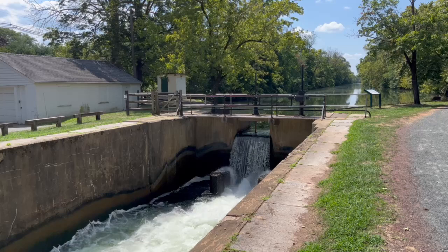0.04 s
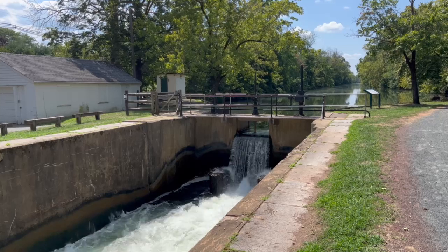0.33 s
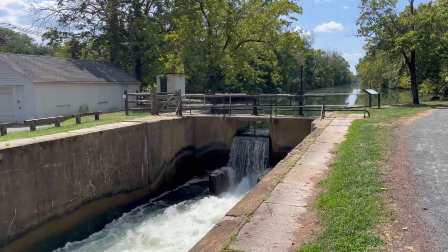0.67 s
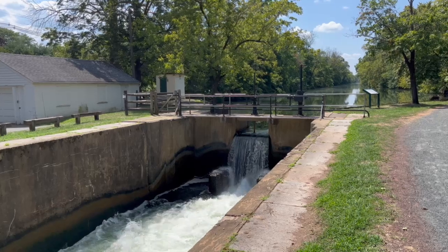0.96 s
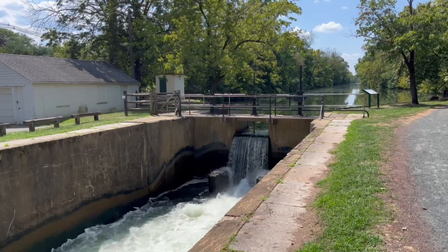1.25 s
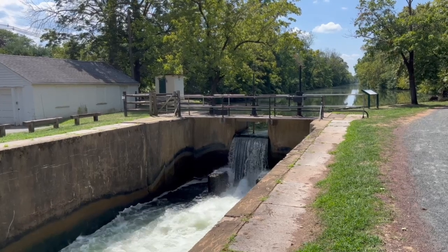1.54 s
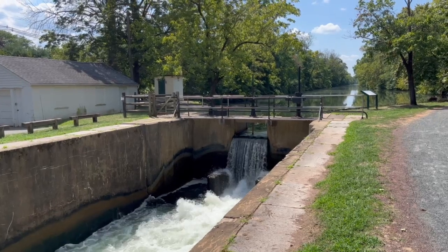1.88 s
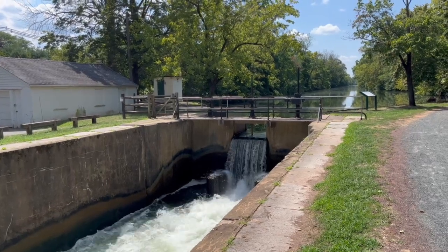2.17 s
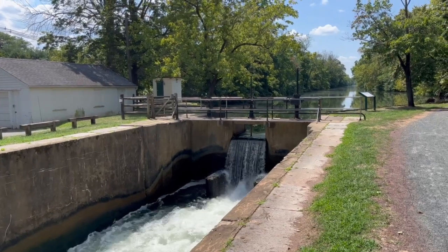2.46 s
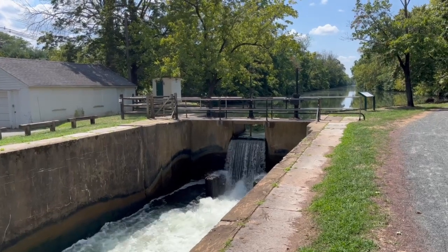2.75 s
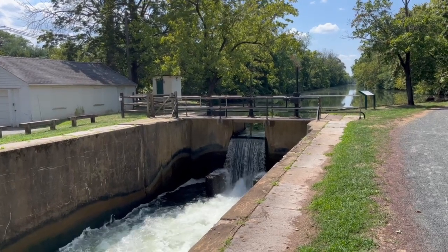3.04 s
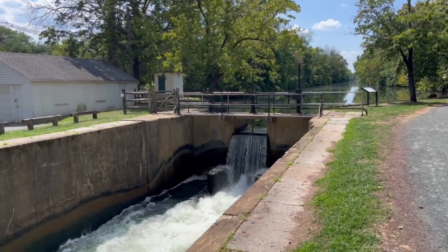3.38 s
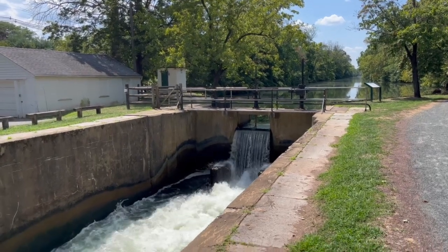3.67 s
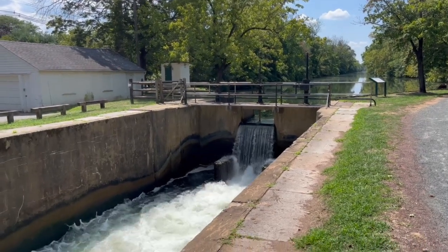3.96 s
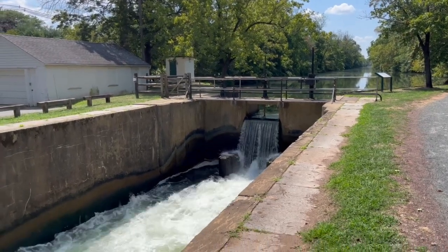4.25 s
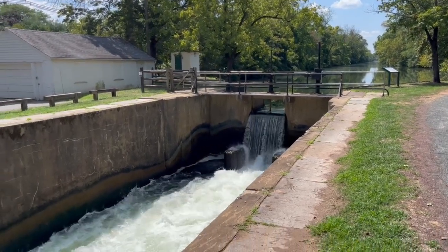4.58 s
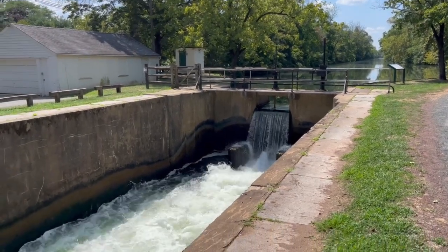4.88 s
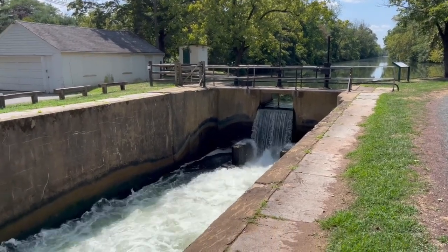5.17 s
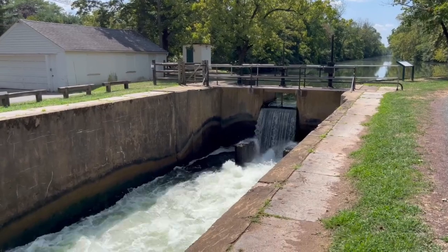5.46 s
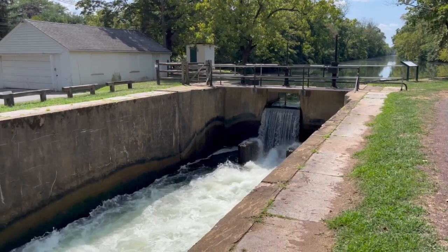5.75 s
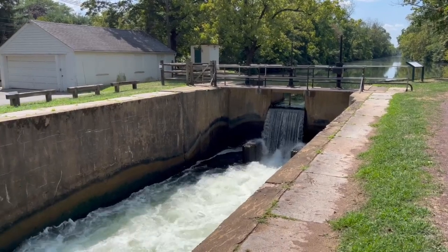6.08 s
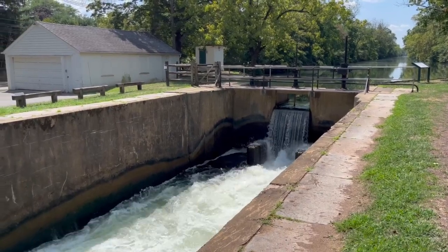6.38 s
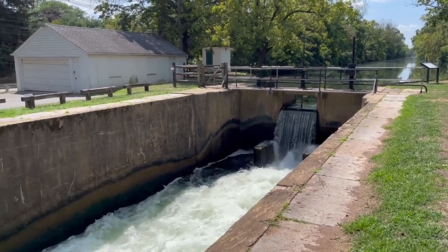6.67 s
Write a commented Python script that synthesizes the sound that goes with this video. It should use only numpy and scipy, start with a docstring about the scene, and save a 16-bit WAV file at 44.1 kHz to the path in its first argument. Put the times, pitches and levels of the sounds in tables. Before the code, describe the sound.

Heard in stereo from the bank of a canal lock, water pours steadily into a pool and roars away as foam. Beneath the rush is a hollow rumble from the walled chamber, dotted with deep gulps, while drops hiss and small bubbles tinkle above it. Around five seconds in, a light fizz swells and recedes. The overall level barely changes.

```python
"""Canal lock, from the bank: water falls over the gate and churns down the concrete chamber.
The plunge drives air resonances between the walls (boom) and drags air pockets under (gulps).
Bubble clouds roar in the race; the falling sheet breaks into hissing drops and small splashes.
Single bubbles ring. Fizzing splash near 2 kHz grows louder for about two seconds, then fades.
A closely spaced microphone pair picks it up."""
import sys
import numpy as np
from scipy import signal
from scipy.fft import rfft, irfft
from scipy.io import wavfile
from scipy.ndimage import uniform_filter1d

SR = 44100
rng = np.random.default_rng(int(sys.argv[2]) if len(sys.argv) > 2 else 0)


def materialize(psi):
    """Save the field psi as 16-bit PCM at rate SR to the path in sys.argv[1].

    A 1-D psi becomes a single channel; in a 2-D psi each row is a channel.
    """
    bounded = np.clip(np.atleast_2d(psi).T, -1, 1)
    quanta = np.round(bounded * 32767).astype(np.int16)
    wavfile.write(sys.argv[1], SR, quanta)


N = 300762
TIME_S, BINS_HZ = np.arange(N) / SR, np.fft.rfftfreq(N, 1 / SR)

# air resonances between the walls (frequency [Hz], half-width [Hz], relative peak density [dB])
CHAMBER_MODES = [(44.3, 6.5, -51.5), (55.5, 7.3, -46.5), (77.7, 13, -49.5), (97.7, 11, -47.5),
                 (131.5, 16.3, -50.5), (179.7, 19.8, -51.5), (216, 9.7, -57)]
# slow surges of the boom (time [s], relative level [dB])
PLUNGE_SURGES = [(0.1, -0.5), (0.5, -1.3), (0.95, 1), (1.35, 1.5), (1.62, -0.5), (2.02, -3.3), (2.3, 0),
                 (3.0, 1), (3.9, 0.2), (4.22, -1.5), (4.45, 1.4), (4.83, -0.3), (5.15, -0.8), (5.6, -2),
                 (6.2, 0.1), (6.8, -0.5)]
# slugs of water hitting the pool (time [s], boom level change [dB])
SLUGS = [(0.652, 6.5), (1.138, 4.5), (1.347, 2), (1.611, 5), (2.827, 6), (3.089, 3.5), (3.22, 2),
         (3.491, 4), (3.823, 3), (4.137, 8), (4.415, -1), (4.575, 1), (4.966, 5), (5.161, 1.5), (6.436, 2)]
# air pockets dragged under (peak time [s], pitch [Hz], peak level [dB])
AIR_POCKETS = [(0.06, 109.6, -26), (0.19, 101.8, -24), (0.439, 192.5, -28.5), (0.94, 178.8, -24.5),
               (1.03, 96.3, -28), (1.15, 91.8, -29), (1.21, 52.6, -22), (1.26, 104, -27), (1.32, 191, -25),
               (1.331, 102.1, -21), (1.6, 59, -27), (2.27, 95.9, -25), (2.43, 82.6, -23.5),
               (2.99, 122.6, -27), (3.1, 110.3, -26), (3.5, 86, -25), (3.82, 90.2, -25), (4.13, 78.3, -30),
               (4.43, 53, -23.5), (4.6, 298, -29), (5.16, 87.5, -27), (5.19, 53.3, -26),
               (5.48, 118.2, -26.5), (6.079, 85.7, -21.5), (6.59, 94.9, -23)]
# bubble clouds in the race (frequency [Hz], relative density [dB])
CHURN_SPECTRUM = [(30, -83), (70, -58), (140, -58), (230, -55), (350, -56), (470, -55.5), (620, -56.3),
                  (800, -58.5), (1190, -62.5), (1420, -62.5), (1820, -66.5), (1910, -70), (3000, -74),
                  (7000, -100)]
# slow surges of the roar (time [s], relative level [dB])
CHURN_SURGES = [(0.1, -0.26), (1.4, -0.45), (2.35, 0.6), (3.3, -0.35), (4.45, -0.14), (4.6, 0.7),
                (4.8, 0.22), (5.33, 0.7), (5.6, -0.5), (5.85, 0.6), (6.4, -0.8), (6.8, -0.11)]
# falling sheet breaking into drops (frequency [Hz], relative density [dB])
SPRAY_SPECTRUM = [(500, -90), (1300, -73), (1950, -70.8), (2300, -69.8), (2950, -69.2), (3130, -69.7),
                  (3420, -67.6), (3660, -69.5), (4000, -70.8), (4180, -70), (4350, -70.8), (4600, -68.9),
                  (5030, -70.9), (5250, -73), (5500, -74.4), (6250, -75.2), (7500, -74.8), (9200, -75.7),
                  (12000, -79.6), (14400, -83.2), (15700, -85.5)]
# slow surges of spray and single bubbles (time [s], relative level [dB])
SPRAY_SURGES = [(0.1, -0.58), (0.45, 0.45), (1.0, -0.7), (1.7, 0.23), (2.1, 0.0), (2.42, 0.8), (2.7, 0.021),
                (3.4, 0.13), (3.73, -0.63), (4.45, -0.13), (5.03, 0.8), (5.3, -0.27), (6.05, 0.65),
                (6.4, -0.45), (6.8, -0.67)]
# microphone pair (frequency [Hz], coherence [0-1], left phase lead [rad], left minus right [dB])
MIC_PAIR = [(60, .999, .05, .2), (250, .98, .19, .8), (600, .91, .32, 2.7), (1100, .79, .58, 1.5),
            (1400, .68, 1, -1.2), (1610, .6, 2.1, -1.9), (1690, .9, .22, .6), (2200, .68, .72, 1.2),
            (2900, .4, 1.7, 1.6), (4000, .4, .41, 2.3), (4900, .4, .89, -.1), (5600, .24, -.62, -2.1),
            (7000, .75, -1.75, .8), (8300, .98, -3.14, 0), (10000, .82, -4.66, 0), (11300, .88, -6.1, 0),
            (12800, .88, -6.5, 0), (15200, .75, -9.4, 0)]


def plunge(level_db=0.5):
    """Falling water pounds the pool and drives the air between the walls."""
    power = sum(gain_of(db) ** 2 / (1 + ((BINS_HZ - hz) / half_width_hz) ** 2) ** 2
                for hz, half_width_hz, db in CHAMBER_MODES)
    boom = coloured(rng.standard_normal((2, N)), np.sqrt(power))
    lumps_db = tumble_db(rms_db=0.75, slow_hz=3.7, fast_hz=19)
    envelope_db = level_db + surge_db(PLUNGE_SURGES) + thumps_db() + lumps_db
    return steadied(boom, window_samples=3000) * gain_of(envelope_db)


def thumps_db(width_s=0.017, lull_delay_s=0.044, lull_share=0.35):
    """A slug of water lifts the boom briefly; a shallow lull follows."""
    level_db = np.zeros(N)
    for at_s, db in SLUGS:
        age_s = TIME_S - at_s
        hit = np.exp(-(age_s / width_s) ** 2)
        lull = np.exp(-((age_s - lull_delay_s) / width_s) ** 2)
        level_db += db * (hit - lull_share * lull)
    return level_db


def gulps(wobble_share=0.0566, rise_per_s=0.406, swell_s=0.046, sink_s=0.043):
    """Big air pockets throb, pitch climbing unsteadily as they rise. Direct row only."""
    wobble = 1 + wobble_share * unit_rms(uniform_filter1d(rng.standard_normal(N), size=800))
    out = np.zeros((2, N))
    for (at_s, hz, db), phase_turns in zip(AIR_POCKETS, rng.random(len(AIR_POCKETS))):
        near = abs(TIME_S - at_s) < 0.25
        age_s = TIME_S[near] - at_s
        pitch_hz = hz * (1 + rise_per_s * age_s) * wobble[near]
        turns = phase_turns + np.cumsum(pitch_hz) / SR
        envelope = np.exp(-(age_s / np.where(age_s < 0, swell_s, sink_s)) ** 2)
        out[0, near] += gain_of(db) * envelope * np.sin(2 * np.pi * turns)
    return out


def churn(level_db=0.21):
    """Bubble clouds tumble down the race and roar."""
    roar = coloured(seething(clump_db=0.7, comb_db=0.44), gain_of(per_bin(CHURN_SPECTRUM)))
    lumps_db = tumble_db(rms_db=0.6, slow_hz=3.4, fast_hz=23)
    return steadied(roar, window_samples=4400) * gain_of(level_db + surge_db(CHURN_SURGES) + lumps_db)


def spray(slaps_per_s=45, decay_s=0.011, splash_rms_db=0.32):
    """Drops hiss; each slap of water lifts the level at once, then decays."""
    hiss = coloured(seething(clump_db=1.0, comb_db=1.85), gain_of(per_bin(SPRAY_SPECTRUM)))
    slaps = rng.exponential(1, N) * (rng.random(N) < slaps_per_s / SR)
    splashes = signal.lfilter([1], [1, -np.exp(-1 / (decay_s * SR))], slaps)
    splashes_db = splash_rms_db * unit_rms(splashes - splashes.mean())
    return steadied(hiss, window_samples=8000) * gain_of(surge_db(SPRAY_SURGES) + splashes_db)


def bubbles(level_db=-43, per_s=600, low_hz=750, high_hz=5200, pitches=48,
            decay_cycles=24, rise=0.008, spread_db=4.1, tilt=0.1):
    """Single bubbles ring briefly, pitch rising as they near the surface."""
    out = np.zeros((2, N))
    age_s = TIME_S[:SR // 10]
    for k, hz in enumerate(np.geomspace(low_hz, high_hz, pitches)):
        decays = age_s * hz / decay_cycles
        envelope = np.exp(-decays) * (1 - np.exp(-10 * decays))
        ring = envelope * np.sin(2 * np.pi * hz * age_s * (1 + rise * decays))
        strengths = gain_of(spread_db * np.minimum(rng.exponential(1, N), 4))
        births = rng.random(N) < per_s / pitches / SR
        out[k % 2] += signal.oaconvolve(strengths * births, ring)[:N] * (low_hz / hz) ** tilt
    return unit_rms(out) * gain_of(level_db + surge_db(SPRAY_SURGES))


def fizz(level_db=-47.8, centre_hz=1950, width_oct=0.71, peak_at_s=5.2, swell_s=0.8):
    """Fizzing splash near 2 kHz grows louder for about two seconds, then fades."""
    band = np.exp(-(np.log2((BINS_HZ + 1) / centre_hz) / width_oct) ** 2)
    splash = unit_rms(coloured(seething(clump_db=-1.0, comb_db=2.5), band))
    envelope = np.exp(-((TIME_S - peak_at_s) / swell_s) ** 4)
    return splash * gain_of(level_db) * envelope


def seething(clump_db, comb_db):
    """Two noises with random patches: broad for foam clumps, narrow for shifting wall echoes."""
    clumped = patchy(rng.standard_normal((2, N)), clump_db, frames=7, bins=4, frame_samples=512)
    return patchy(clumped, comb_db, frames=20, bins=3, frame_samples=4096)


def patchy(x, depth_db, frames, bins, frame_samples):
    """Random level patches over time and frequency; unit rms out."""
    spectra = signal.stft(x, nperseg=frame_samples)[2]
    patches = rng.standard_normal(spectra.shape[:0:-1]).T
    patches = uniform_filter1d(patches, frames, axis=1)
    patches = unit_rms(uniform_filter1d(patches, bins, axis=0))
    mottled = signal.istft(spectra * gain_of(depth_db * patches), nperseg=frame_samples)[1]
    return unit_rms(mottled[:, :N])


def tumble_db(rms_db, slow_hz, fast_hz):
    """Random level flutter at rates from slow_hz to fast_hz."""
    band = 1 / np.sqrt((1 + (slow_hz / (BINS_HZ + 1e-9)) ** 4) * (1 + (BINS_HZ / fast_hz) ** 4))
    return rms_db * unit_rms(coloured(rng.standard_normal(N), band))


def surge_db(curve):
    """Level curve per sample, mean removed."""
    times_s, levels_db = np.transpose(curve)
    level_db = np.interp(TIME_S, times_s, levels_db)
    return level_db - level_db.mean()


def steadied(x, window_samples):
    """Flattens chance swells longer than the window."""
    power = uniform_filter1d(uniform_filter1d(x[0] ** 2, window_samples), window_samples)
    return x * np.sqrt(power.mean() / power)


def coloured(white, density):
    """Shapes unit-rms white noise to an amplitude density."""
    return irfft(rfft(white) * density, N) * np.sqrt(SR / 2)


def per_bin(table, column=1):
    """Table column per FFT bin, interpolated over log frequency."""
    rows = np.array(table)
    return np.interp(np.log(BINS_HZ + 1), np.log(np.sort(rows[:, 0]) + 1), rows[:, column])


def gain_of(db):
    """dB to amplitude."""
    return 10 ** (np.asarray(db) / 20)


def unit_rms(x):
    """Scales to rms 1."""
    return x / np.sqrt(np.mean(x ** 2) + 1e-20)


def microphones(x):
    """Rows (direct, diffuse) to (left, right): alike in the bass, apart in level and phase above."""
    coherence = np.clip(per_bin(MIC_PAIR, column=1), 0, 1)
    lead_rad, balance_db = per_bin(MIC_PAIR, column=2), per_bin(MIC_PAIR, column=3)
    direct, diffuse = rfft(x)
    right = (coherence * direct + np.sqrt(1 - coherence ** 2) * diffuse) * np.exp(-1j * lead_rad)
    return irfft(np.array([direct * gain_of(balance_db / 2), right * gain_of(-balance_db / 2)]), N)


def scene():
    """All the water, from the lock's edge."""
    return microphones(plunge() + gulps() + churn() + spray() + bubbles() + fizz())


def record(dry, low_cut_hz=39, start_s=0.035, high_cut_hz=14800):
    """Rumble filter, mute until start_s, top treble cut."""
    low_cut = signal.butter(6, low_cut_hz, "highpass", fs=SR, output="sos")
    high_cut = signal.firwin(511, high_cut_hz, window=("kaiser", 9), fs=SR)
    opened = signal.sosfilt(low_cut, dry) * (TIME_S > start_s)
    return signal.oaconvolve(opened, high_cut[None], "same")


dry = scene()
out = record(dry)
materialize(out)
```